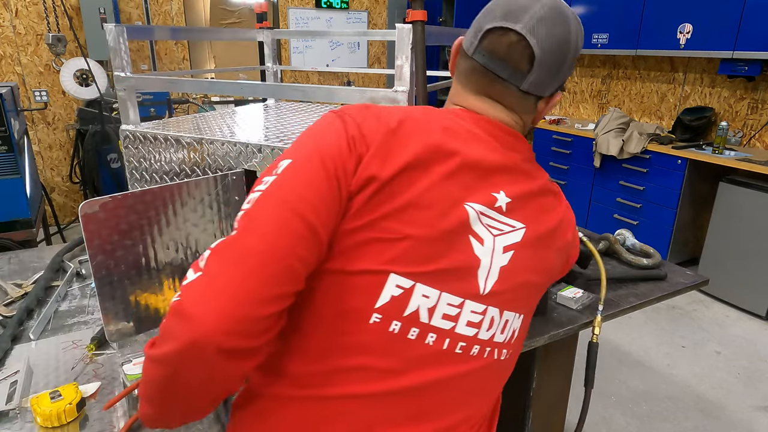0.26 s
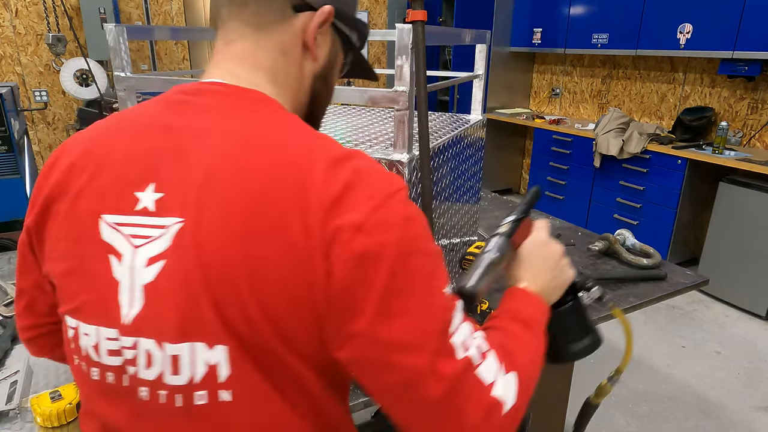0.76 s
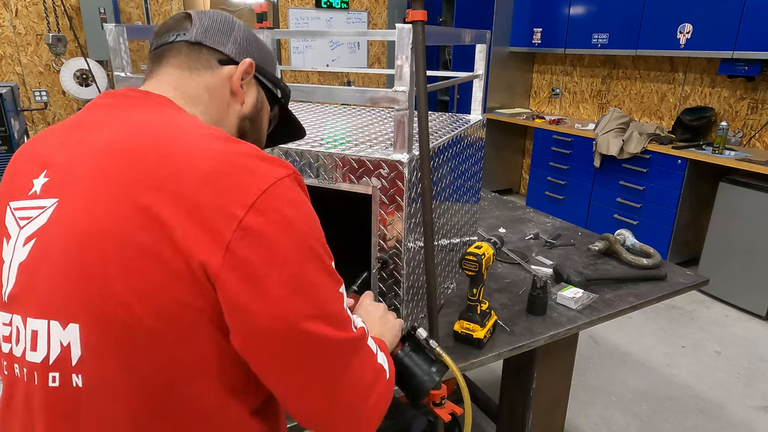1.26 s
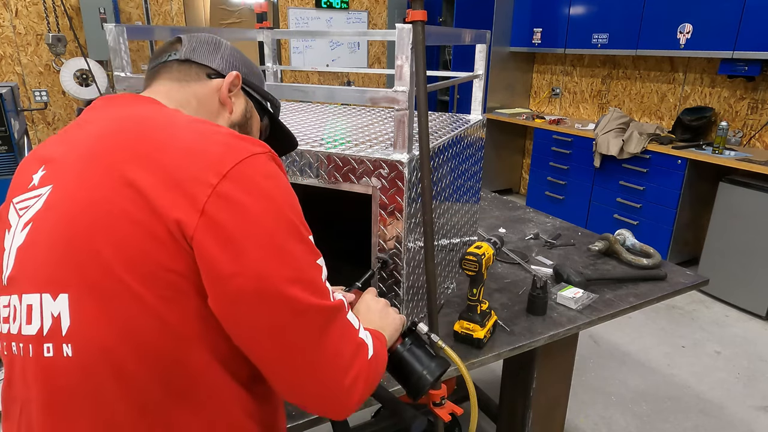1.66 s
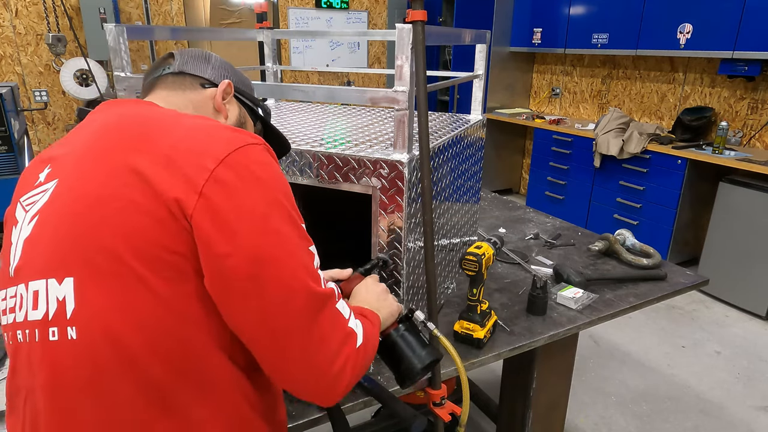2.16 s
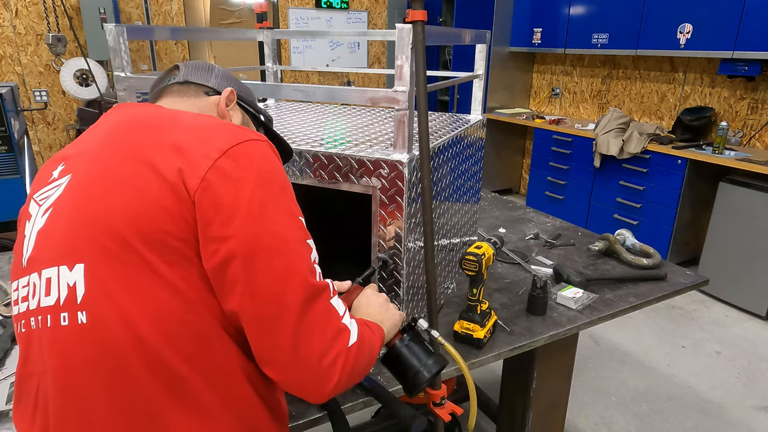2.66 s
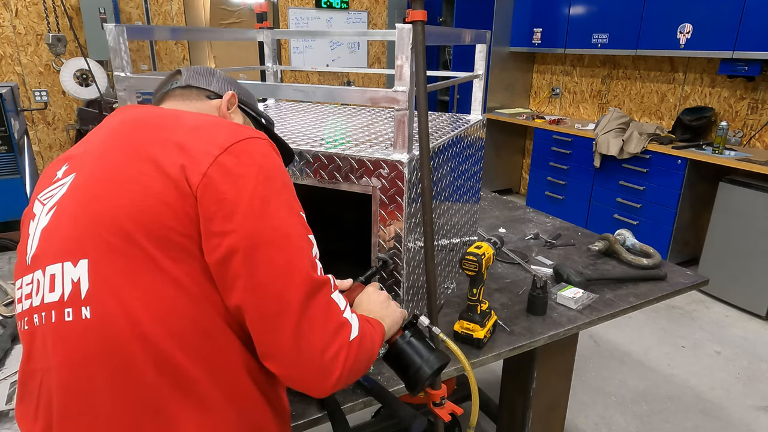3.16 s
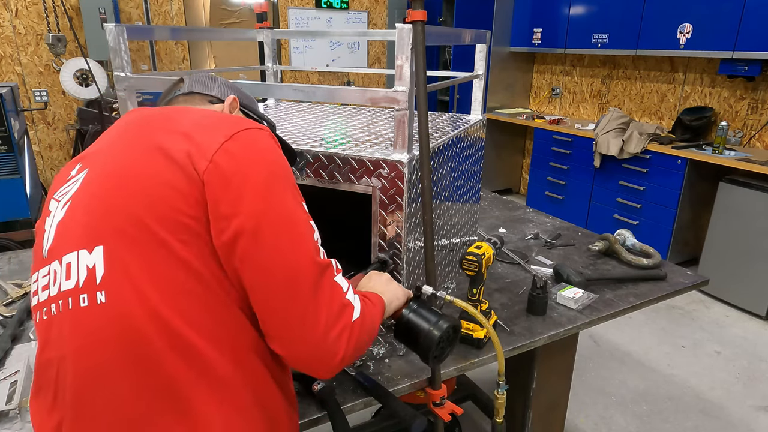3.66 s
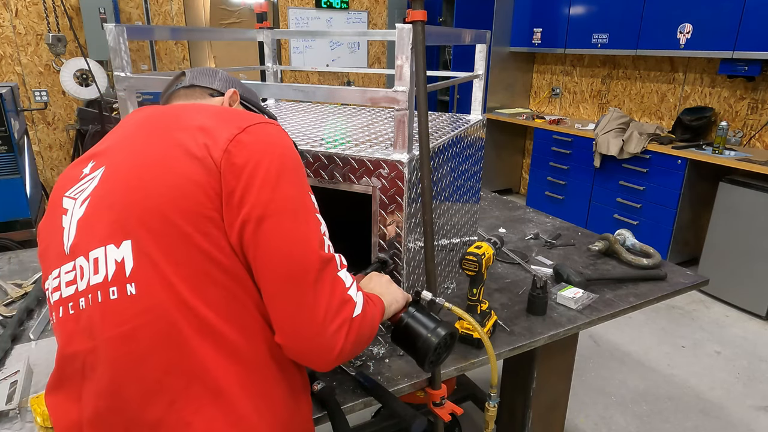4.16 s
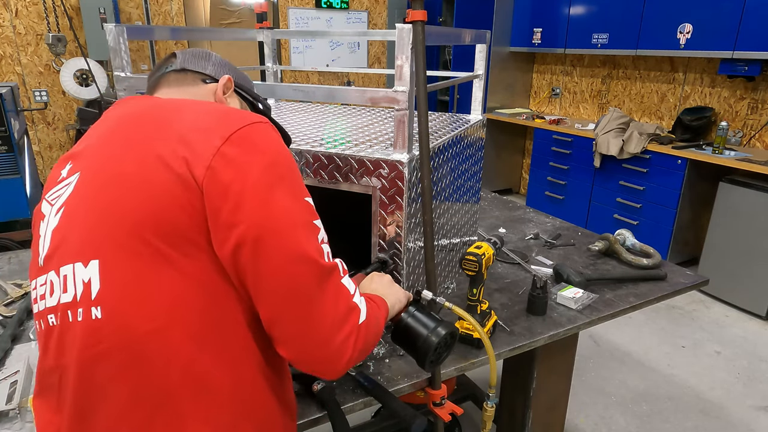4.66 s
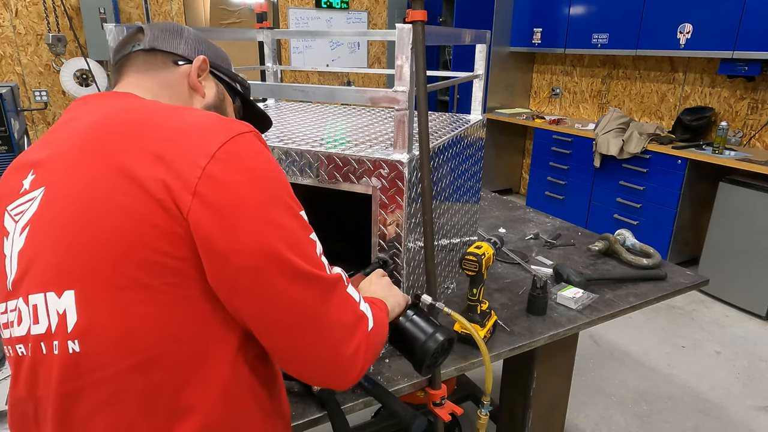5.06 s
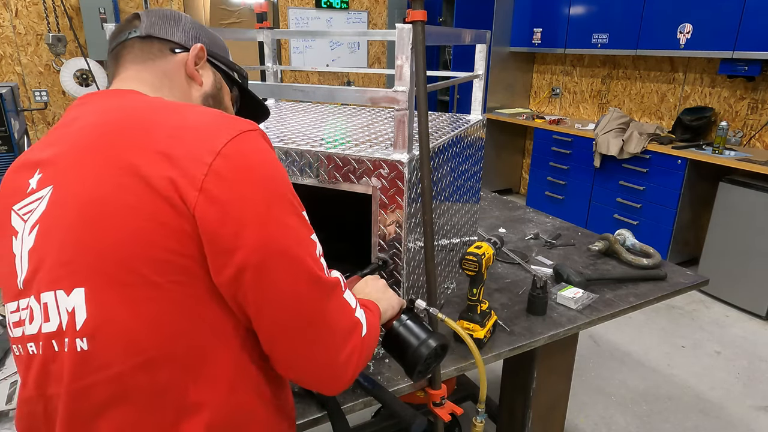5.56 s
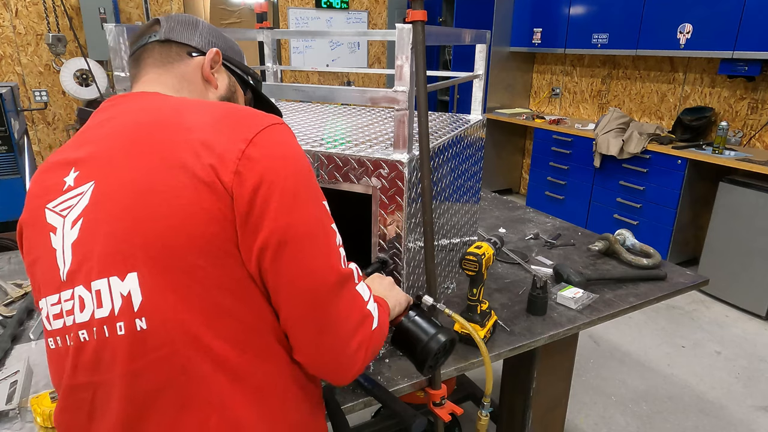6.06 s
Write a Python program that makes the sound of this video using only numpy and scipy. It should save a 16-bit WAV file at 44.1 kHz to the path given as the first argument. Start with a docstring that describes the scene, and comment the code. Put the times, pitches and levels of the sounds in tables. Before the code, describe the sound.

A pneumatic rivet gun is heard close up in a reverberant shop with a low fan rush. First come light tool clanks, a short rasp of steel, and scattered taps and clinks against a hollow metal box. Then air hisses and the rivet breaks with one loud, thumping, ringing crack. The gun vents sharply, knocks against the plate a few more times and starts hissing again.

```python
"""Tools clank on a steel workshop bench, then an air rivet gun is dragged off it and its nose bumps
and scrapes a hollow aluminium tread-plate box. The valve opens and hisses, the mandrel snaps and
sets the plate ringing, and on release the piston vents in a blast. On a second pull the gun kicks
hard against the box. One microphone, close to the work, with the hall and its ventilation behind;
it overloads on the snap and turns its gain down."""
import sys
import numpy as np
from scipy import signal
from scipy.fft import rfft, irfft, next_fast_len
from scipy.io import wavfile

SR = 44100
rng = np.random.default_rng(int(sys.argv[2]) if len(sys.argv) > 2 else 0)


def dump_mix(stems):
    """Bounce the given channels to the path in sys.argv[1] as a 16-bit WAV at rate SR."""
    frames = np.atleast_2d(stems).T  # one column per channel
    limited = np.clip(frames, -1, 1)  # hard clip at full scale
    pcm = np.round(limited * 32767).astype(np.int16)
    wavfile.write(sys.argv[1], SR, pcm)


N = 278267
SIZE = next_fast_len(N, True)
TIME = np.arange(N) / SR
FREQ = np.maximum(np.fft.rfftfreq(SIZE, 1 / SR), 1)

# the mandrel breaks, then the piston recoils
SNAP_S, SNAP_DB, RECOIL_AFTER_S, RECOIL_DB = 4.246, -38.5, 0.015, -41.5
# spectrum of both blows: f/Hz, level/dB
SNAP_COLOUR = [(35, 11.5), (150, -6), (925, 4), (2790, -1.5), (7270, -8.5)]
# broad colour of struck metal: f/Hz, level/dB
METAL_COLOUR = [(30, -35), (60, -9.5), (95, -2), (150, -8.5), (210, -3.5), (350, -1), (620, -2.5),
                (1500, 0), (3600, 8.5), (4600, -1), (5900, -1), (7400, -5.5), (11500, -10), (15500, -26.5)]
# plate modes of the box: f/Hz, level/dB, t60/s
BOX_MODES = [(95.6, -3.5, 1.15), (128.4, -9.5, 3), (179, -9.5, 2), (218, 1.5, 1.3), (316, -4.5, 1.5),
             (345, -2.5, 1.73), (504.6, 3.5, 0.98), (658, 1.5, 1.1), (980, 5, 0.57), (1050, 7, 0.92),
             (1495, 5, 0.9), (1703, 4, 0.96), (2454, 1.5, 0.55), (2795, -2, 0.7), (3567, -0.5, 0.55),
             (3796, -1, .65)]
# resonances and dips of the riveted plate: f/Hz, width/Hz, gain/dB
PLATE_PEAKS = [(205, 81, 10.5), (358, 35, -8.5), (1490, 500, 5), (2104, 240, -9.5), (2380, 220, 2.5),
               (3800, 370, 2)]
# resonances and dips of the hollow box: f/Hz, width/Hz, gain/dB
HOLLOW_PEAKS = [(314, 20, 6), (4234, 140, -8), (5770, 850, 7)]

# trigger pulls: t/s, hold/s, seal squeak/dB, valve opening time/s
PULLS = [(4.057, 0.8443, -20.5, 0.01), (5.879, .841, -26.5, 0.0091)]
# hiss of the open valve: f/Hz, level/dB
LEAK_COLOUR = [(300, -10), (2800, -3.5), (3800, 4.5), (4700, -9), (5700, 0.5), (9500, -1.5), (12500, -8),
               (15500, -12.5)]
# resonance of the air port: f/Hz, width/Hz, gain/dB
PORT_PEAK = [(2460, 160, 4.4)]
# edge tones at the valve: f/Hz, level re flow at full swell/dB
WHISTLES = [(7700, -3), (11600, -11.5)]
# exhaust air: f/Hz, level/dB
VENT_COLOUR = [(40, -14.5), (250, -19.5), (1300, -8.5), (2000, -5.5), (3100, 3.5), (4400, -9.5),
               (5700, -2.5), (7200, -11.5), (8700, -7.5), (12000, -18), (15500, -22)]
# the slow exhaust loses its top: f/Hz, width/Hz, gain/dB
RETURN_MUFFLE = [(12800, 7500, -15.5)]
# the mandrel and the returning piston squeak as they slide: t/s, f/Hz, level/dB, length/s
SLIDE_SQUEAKS = [(2.046, 5650, -31.5, 0.039), (5.085, 3310, -32.5, 0.028), (5.16, 9300, -53, 0.04),
                 (5.196, 8000, -44.5, 0.022), (5.203, 3170, -29, 0.032)]
# piston seals on each pull: delay/s, f/Hz, level re seal squeak/dB, length/s
SEAL_TONES = [(0.02, 3090, -3, 0.019), (0.021, 2130, -10, 0.039), (.054, 5470, -23, .13)]

# nose bumps on the box: t/s, push/dB, contact/ms, tick/dB, panel f/Hz, panel ring re push/dB
BUMPS = [(1.709, -65.5, 2.3, -96, 1056, 29), (2.0, -42.5, 4.7, -81, 391.6, 18.5),
         (2.023, -53, 0.91, -74.5, 475.5, 21.5), (2.051, -44, 3.6, -71, 347.4, 18),
         (2.147, -45, 3.3, -65.5, 343.7, 21.5), (2.228, -43.5, 1.53, -67, 1416, 24.5),
         (2.237, -46, 5.7, -84, 363, 24), (2.772, -55, 3.84, -93, 1054, 24),
         (3.039, -61.5, 1.7, -86, 357, 17), (3.328, -50, 1.19, -79, 321, 20.5),
         (4.08, -54, 1.12, -72.5, 980, -9), (5.158, -46.5, 2.75, -85, 475.3, 22.5),
         (5.238, -56.5, 2.66, -83.5, 1123, 31), (5.691, -50.5, 1.43, -85.5, 503, 25),
         (5.699, -54.5, 1.18, -94, 727, 26), (5.906, -41.5, 5.5, -77, 483, 20),
         (5.965, -44, 0.71, -67.5, 1488, 20.5)]
PUSH_FALL, PUSH_TOP_HZ, TICK_FROM_HZ = 0.74, 5230, 2900   # the push loses treble, the tick takes over
# the nose scrapes the plate, pressing ever harder: t/s, length/s, final push/dB
SCRAPES = [(2.125, 0.024, -49), (2.735, 0.04, -69.5), (3.235, 0.09, -59.5), (5.062, 0.087, -55.5),
           (5.17, .06, -55)]
SCRAPE_SWELL_DB, SCRAPE_CONTACT_MS, SCRAPE_TICK_RE_PUSH_DB = 6, 2.3, -37
SCRAPE_LOW_HZ = 200   # a glancing touch moves no bass
# knocks that jar the steel body of the gun: t/s, f/Hz, level/dB
JARS = [(1.709, 2340, -55), (2.227, 3434, -28), (3.329, 2943, -33.5), (5.693, 3286, -29)]
# the loose mandrel clinks in the nose: t/s, level/dB
CLINKS = [(1.707, -61), (1.797, -64.5), (2.148, -58), (3.038, -68), (3.326, -49.5), (3.432, -56.5),
          (5.24, -62)]
# modes of the mandrel: f/Hz, level/dB, t60/s
MANDREL_MODES = [(5730, 5, 0.11), (7870, -3, 0.17), (13000, -7, 0.085)]
# the gun rubs the plate as it is lined up: t/s, length/s, level/dB
RUBS = [(2.989, 0.051, -54), (3.665, 0.23, -58)]
# resonances of the rubbing nose: low f/Hz, high f/Hz, level/dB
RUB_BANDS = [(2780, 3700, 0), (5200, 6200, -5)]

# short drags of the gun over the bench: t/s, length/s, rasp/dB, bench judder/dB
DRAGS = [(0.948, 0.023, -37, -45.5), (0.972, 0.048, -33.5, -59), (1.046, 0.045, -39, -47.5)]
# rasp of steel on steel: f/Hz, level/dB
RASP_COLOUR = [(400, -22), (1000, -6), (2800, 3.5), (3700, 2), (4500, -13.5), (6000, -11.5), (15000, -49)]
# tools land on the bench: t/s, level/dB, tilt/(dB per octave)
CLANKS = [(0.153, -86, -7), (.195, -60.5, -0.5), (.203, -57.5, -1)]
# spectrum of a clank: f/Hz, level/dB
CLANK_COLOUR = [(80, -18.5), (925, -3), (2790, -2.5), (7270, -23.5)]
# modes of the bench: f/Hz, level/dB, t60/s
BENCH_MODES = [(338, 17.5, 1), (577, 22.5, 0.85), (854, 21, 1), (2600, 23.5, 0.81)]

# decay of the workshop hall: f/Hz, t60/s
HALL_T60 = [(60, 0.61), (200, 1.83), (500, 1.24), (1200, 0.75), (3000, 0.86), (6000, 0.78), (10000, 0.36)]
# colour of the hall as heard at the microphone: f/Hz, level/dB
HALL_COLOUR = [(60, -6.5), (250, -17.5), (800, -10), (3000, -17), (8000, -11.5), (15000, -23)]
# ventilation noise: f/Hz, level/dB
FAN_COLOUR = [(25, -2.5), (110, -14.5), (350, -18), (600, -20.5), (4800, -23.5), (10000, -34.5),
              (15500, -37)]
# its resonances: f/Hz, width/Hz, gain/dB
FAN_PEAKS = [(1070, 210, 8.9), (1900, 270, 7.5), (3080, 240, 8.5), (8150, 590, 5.6)]


def rivet_snap():
    """The mandrel breaks and the piston recoils: two blows, as times and strengths at any pitch."""
    times, blow_db = [SNAP_S, SNAP_S + RECOIL_AFTER_S], np.array([SNAP_DB, RECOIL_DB])
    return times, lambda hz: from_db(blow_db + at_hz(SNAP_COLOUR, hz))


def snap_thump(db, hz, t60):
    """A short, deep thump at the snap."""
    return ring(clicks([SNAP_S], [from_db(db)]), hz, t60)


def clatter(blows, peaks, bass_t60, level_db, crack_db, crack_t60, damping, swell_share,
            hall_db, mode_db, ripple_db):
    """Struck metal: a brief crack, then plate modes too dense to tell apart, then the hall."""
    times, strength = blows
    out, edges, age = np.zeros(N), np.geomspace(28, 17000, 29), TIME[:SR]
    crowding = resonances([(hz, 8 + hz / 90, mode_db) for hz, _, _ in BOX_MODES])   # round clear modes
    comb = ripple(ripple_db, longest_s=0.01) * FREQ / (FREQ + 1500)
    colour = at_hz(METAL_COLOUR, FREQ) + resonances(peaks) + crowding + comb + level_db
    wash = rfft(rng.standard_normal(SIZE)) * from_db(colour) * np.sqrt(SR / 2)
    crack = from_db(2 * crack_db - 120 * age / crack_t60)
    for low, high in zip(edges, edges[1:]):
        hz, power = np.sqrt(low * high), np.zeros(N)
        t60 = bass_t60 * (1 + (hz / 5000) ** 2) ** -damping   # treble dies first
        swell_s = swell_share * bass_t60 * (1 + 800 / hz)   # slow bending waves build up last
        swell = 1 - np.exp(-age / swell_s)
        shape = swell * np.exp(-np.log(1e6) * age / t60) + crack * hz / (hz + 6000)
        shape *= (1 - np.exp(-age * hz)) ** 4   # each band needs a cycle or two to start
        for s, size in zip(times, strength(hz)):
            start = int(s * SR)
            power[start:start + SR] += size ** 2 * shape[:N - start]
        envelope = hall_envelope(power, at_hz(HALL_COLOUR, hz) + hall_db, at_hz(HALL_T60, hz))
        out += irfft(wash * ((FREQ >= low) & (FREQ < high)), SIZE)[:N] * envelope
    return out


def box(blows, level_db, scatter_db=3.5, split_hz=4.95):
    """Each blow rings the modes of the box in beating pairs, as strongly as its landing spot allows."""
    (times, strength), out = blows, np.zeros(N)
    for hz, db, t60 in BOX_MODES:
        for side in (-1, 1):
            spot = from_db(scatter_db * rng.standard_normal(len(times)))
            spot *= rng.choice([-1, 1], len(times))
            hits = clicks(times, strength(hz) * from_db(db + level_db) * spot)
            out += ring(hits, hz + side * split_hz * rng.random(), t60)
    return out


def air_jet(flow, colour, peaks, hall_db, hall_t60, ripple_db, sputter_db):
    """A turbulent jet follows the flow, sputters, drifts between two spectra and hangs in the hall."""
    power = (flow * from_db(sputter_db * band(12.4, 150))) ** 2
    comb = ripple(ripple_db, longest_s=0.0026) * FREQ / (FREQ + 3000)
    steady = at_hz(colour, FREQ) + resonances(peaks) + comb
    one, other = (noise(steady + ripple(ripple_db, longest_s=0.007)) for _ in range(2))
    turn = band(2.0, 7.3)
    return (one * np.cos(turn) + other * np.sin(turn)) * hall_envelope(power, hall_db, hall_t60)


def blast_flow(db, peak_s):
    """On release the piston dumps its air: the flow swells to a peak and empties."""
    ages = [since(s + held) / peak_s for s, held, *_ in PULLS]
    return from_db(db) * sum((age * np.exp(1 - age)) ** 2 for age in ages)


def return_flow(chuff_db, chuff_s, hiss_db, fall_db_per_s, travel_s):
    """The valve chuffs on release, then a hiss fades until the piston is home."""
    flow = np.zeros(N)
    for s, held, *_ in PULLS:
        age = since(s + held)
        sliding = (age > 0) & (age < travel_s)
        chuff = from_db(chuff_db) * np.exp(-age / chuff_s)
        flow += sliding * np.hypot(chuff, from_db(hiss_db - fall_db_per_s * age))
    return flow


def leak_flow(spurt_db, spurt_s, leak_db, build_db_per_s, close_s):
    """A spurt as the valve opens, then a leak that grows until it closes."""
    flow = np.zeros(N)
    for s, held, _, open_s in PULLS:
        age = since(s)
        valve = np.clip(np.minimum(age / open_s, (held - age) / close_s), 0, 1)
        spurt = from_db(spurt_db) * np.exp(-(age / spurt_s) ** 2)
        flow += valve * np.hypot(spurt, from_db(leak_db + build_db_per_s * age))
    return flow


def whistles(flow, waver, flutter_hz):
    """Edge tones at the valve wander in pitch and swell while the trigger is held."""
    swell = sum(since(s) / held * (since(s) < held) for s, held, *_ in PULLS)
    tones = sum(from_db(db) * rough_tone(hz * (1 + waver * band(2, 10)), flutter_hz)
                for hz, db in WHISTLES)
    return flow * swell * tones


def squeaks(width, fall, hall_db, hall_t60):
    """Rough friction tones: sliding parts fall in pitch as they slow, the seals hold theirs."""
    out = np.zeros(N)
    slides = [(*row, fall) for row in SLIDE_SQUEAKS]
    seals = [(s + delay, hz, pull_db + db, length, 0)
             for s, _, pull_db, _ in PULLS for delay, hz, db, length in SEAL_TONES]
    for s, hz, db, length, drop in slides + seals:
        along = np.clip((TIME - s) / length, 0, 1)
        envelope = hall_envelope(np.sin(np.pi * np.sqrt(along)) ** 2, hall_db, hall_t60)
        out += from_db(db) * envelope * rough_tone(hz * (1 + drop * (0.5 - along)), hz * width)
    return out


def nose_contacts(touches=8):
    """The nose bumps the box and scrapes it in runs of small touches: times and strengths."""
    rows = [(*bump[:4], 0) for bump in BUMPS]
    for s, length, db in SCRAPES:
        for along in (np.arange(touches) + rng.random(touches)) / touches:
            touch_db = db - SCRAPE_SWELL_DB * (1 - along)
            rows.append((s + along * length, touch_db, SCRAPE_CONTACT_MS,
                         touch_db + SCRAPE_TICK_RE_PUSH_DB, SCRAPE_LOW_HZ))
    times, push_db, contact_ms, tick_db, low_hz = np.transpose(rows)

    def strength(hz):
        """A push, duller the longer the contact, plus a bright metal tick."""
        push = from_db(push_db) * (1 + (hz * contact_ms / 1000) ** 2) ** -PUSH_FALL
        push /= (1 + (hz / PUSH_TOP_HZ) ** 6) * (1 + (low_hz / hz) ** 2)
        tick = from_db(tick_db) / (1 + (TICK_FROM_HZ / hz) ** 4)
        return np.hypot(push, tick)
    return times, strength


def panels(blows, t60, spread):
    """The panel under each bump sings on at its own pitch, as loudly as the bump drives it there."""
    (_, strength), out = blows, np.zeros(N)
    for k, (s, *_, hz, ring_db) in enumerate(BUMPS):
        hit = clicks([s], [strength(hz)[k] * from_db(ring_db)])
        out += cluster(hit, hz, t60, spread, count=8)
    return out


def gun_body(t60, spread):
    """The jarred gun rings in a tight cluster of high modes."""
    return sum(cluster(clicks([s], [from_db(db)]), hz, t60, spread, count=6) for s, hz, db in JARS)


def mandrel(spread):
    """The loose steel pin rings high and briefly."""
    times, clink_db = np.transpose(CLINKS)
    return sum(cluster(clicks(times, from_db(clink_db + db)), hz, t60, spread, count=6)
               for hz, db, t60 in MANDREL_MODES)


def rubs():
    """Light friction swells and fades in two resonances of the gun's nose."""
    pressure = sum(from_db(db) * np.sin(np.pi * np.minimum(since(s) / length, 1))
                   for s, length, db in RUBS)
    return pressure * sum(from_db(db) * band(low, high) for low, high, db in RUB_BANDS)


def drag(slips_per_s, grit_db, judder_hz, hall_db, hall_t60):
    """Steel slips over steel in tiny jerks that rasp and shake the bench top."""
    slips = (rng.random(N) < slips_per_s / SR) * from_db(grit_db * rng.standard_normal(N)) ** 2
    grain, out = linger(slips / slips.mean(), t60=0.028), np.zeros(N)
    rasp = noise(at_hz(RASP_COLOUR, FREQ) + ripple(2.5, longest_s=0.007))
    judder = band(*judder_hz)
    for column, sound in enumerate((rasp, judder)):
        pushes = sum(from_db(2 * db[column]) * ((TIME >= s) & (TIME < s + length))
                     for s, length, *db in DRAGS)
        out += sound * hall_envelope(grain * pushes, hall_db, hall_t60)
    return out


def tool_clanks():
    """Tools hit the bench, each with its own brightness: times and strengths."""
    times, db, tilt = np.transpose(CLANKS)
    return times, lambda hz: from_db(db + at_hz(CLANK_COLOUR, hz) + tilt * np.log2(hz / 1500))


def bench(blows, spread):
    """Every clank rings the modes of the steel bench."""
    times, strength = blows
    return sum(cluster(clicks(times, strength(hz) * from_db(db)), hz, t60, spread, count=5)
               for hz, db, t60 in BENCH_MODES)


def ripple(depth_db, longest_s, count=12):
    """Reflections off nearby metal comb the spectrum; a dB curve."""
    lags = longest_s * rng.uniform(0.204, 1, count)
    return depth_db * rms_one(sum(np.cos(2 * np.pi * FREQ * lag) for lag in lags))


def hall_envelope(power, hall_db, t60):
    """Amplitude at the microphone: direct power plus what lingers in the hall."""
    return np.sqrt(power + from_db(2 * hall_db) * linger(power, t60))


def ventilation(db):
    """Room tone: the steady rush of a fan behind the work."""
    return from_db(db) * noise(at_hz(FAN_COLOUR, FREQ) + resonances(FAN_PEAKS))


def from_db(db):
    """Decibels to gain."""
    return 10 ** (np.asarray(db) / 20)


def rms_one(x):
    """Scale to unit rms."""
    return x / np.sqrt(np.mean(x ** 2) + 1e-20)


def since(s):
    """Seconds since a moment, zero before it."""
    return np.maximum(TIME - s, 0)


def at_hz(points, hz):
    """Read a table on a log-frequency axis."""
    points = np.array(points)
    return np.interp(np.log(hz), np.log(points[:, 0]), points[:, 1])


def resonances(peaks):
    """The dB curve of a set of resonances."""
    return sum(db / (1 + (2 * (FREQ - hz) / width) ** 2) for hz, width, db in peaks)


def noise(colour_db):
    """Unit noise shaped by a dB curve."""
    return rms_one(irfft(rfft(rng.standard_normal(SIZE)) * from_db(colour_db), SIZE)[:N])


def band(low, high):
    """Unit noise between two edges in Hz."""
    bandpass = signal.butter(3, [low, high], "band", fs=SR, output="sos")
    return rms_one(signal.sosfilt(bandpass, rng.standard_normal(N)))


def rough_tone(hz, flutter_hz):
    """A fluttering tone of unit rms that follows a pitch curve."""
    return np.sqrt(2) * band(8.9, flutter_hz) * np.sin(2 * np.pi * np.cumsum(hz) / SR)


def clicks(times, sizes):
    """One click of a given size at each time."""
    return np.bincount((np.asarray(times) * SR).astype(int), sizes, N)[:N]


def ring(hits, hz, t60):
    """A unit click sets a sine of height 1 ringing."""
    r, w = 1e-3 ** (1 / (t60 * SR)), 2 * np.pi * hz / SR
    return signal.lfilter([0, np.sin(w)], [1, -2 * r * np.cos(w), r * r], hits + 1e-18)


def cluster(hits, hz, t60, spread, count):
    """Close modes that beat and radiate little below their pitch."""
    offsets = (np.arange(count) + rng.random(count)) * 2 / count - 1
    modes = sum(rng.choice([-1, 1]) * ring(hits, hz * (1 + spread * offset), t60) for offset in offsets)
    return signal.sosfilt(signal.butter(2, hz / 2, "high", fs=SR, output="sos"), modes)


def linger(power, t60):
    """Energy gathers and drains 60 dB in t60 seconds."""
    r = 1e-6 ** (1 / (t60 * SR))
    return signal.lfilter([1 - r], [1, -r], power + 1e-20)


def scene():
    """Metal, air and room tone meet at one close microphone, the same on both channels."""
    tools, nose, rivet = tool_clanks(), nose_contacts(), rivet_snap()
    clanking = clatter(tools, HOLLOW_PEAKS, bass_t60=0.38, level_db=2.5, crack_db=7.5, crack_t60=0.026,
                       damping=0.13, swell_share=0.017, hall_db=13.0, mode_db=8.0, ripple_db=3.5)
    bumping = clatter(nose, HOLLOW_PEAKS, bass_t60=0.38, level_db=2.0, crack_db=7.0, crack_t60=0.011,
                      damping=0.6, swell_share=0.02, hall_db=9.0, mode_db=0.5, ripple_db=2.5)
    snapping = clatter(rivet, PLATE_PEAKS, bass_t60=0.25, level_db=2.5, crack_db=7.0, crack_t60=0.072,
                       damping=0.11, swell_share=0.034, hall_db=5.0, mode_db=9.5, ripple_db=0.5)
    snapping += snap_thump(db=-16.5, hz=48, t60=0.17)
    ringing = bench(tools, spread=0.074) + mandrel(spread=0.068)
    ringing += panels(nose, t60=0.7, spread=0.14) + gun_body(t60=0.21, spread=0.1)
    ringing += box(nose, level_db=9.0) + box(rivet, level_db=0.5)
    dragging = drag(slips_per_s=2900, grit_db=-4.5, judder_hz=(313, 865), hall_db=-3.0, hall_t60=0.6)

    leak = leak_flow(spurt_db=-35, spurt_s=0.054, leak_db=-47, build_db_per_s=4, close_s=0.059)
    blast = blast_flow(db=-16.5, peak_s=0.029)
    homing = return_flow(chuff_db=-21, chuff_s=0.02, hiss_db=-24.5, fall_db_per_s=51, travel_s=0.328)
    air = air_jet(leak, LEAK_COLOUR, PORT_PEAK,
                  hall_db=-2.5, hall_t60=0.74, ripple_db=2.0, sputter_db=1.5)
    air += whistles(leak, waver=0.014, flutter_hz=200)
    air += air_jet(blast, VENT_COLOUR, (), hall_db=-7.0, hall_t60=0.47, ripple_db=2.0, sputter_db=-1.0)
    air += air_jet(homing, VENT_COLOUR, RETURN_MUFFLE,
                   hall_db=-8.5, hall_t60=0.51, ripple_db=4.0, sputter_db=1.5)

    room_tone = ventilation(db=-57)
    friction = rubs() + squeaks(width=0.042, fall=0.09, hall_db=-9.0, hall_t60=0.25)
    mono = snapping + air + bumping + ringing + friction + dragging + clanking + room_tone
    return np.array([mono, mono])


def gain_control(x, threshold_db, recover_db_per_s, attack_s):
    """The gain drops when the sound passes a threshold and creeps back."""
    level_db = 10 * np.log10(linger(x[0] ** 2, t60=0.11))
    over_db = np.maximum(level_db - threshold_db, 0)
    cut_db = np.maximum.accumulate(over_db + recover_db_per_s * TIME) - recover_db_per_s * TIME
    r = np.exp(-1 / (attack_s * SR))
    return x * from_db(-signal.lfilter([1 - r], [1, -r], cut_db))


def record(dry):
    """The microphone's gain control, overload on what slips past it, and a steep top cut."""
    ducked = gain_control(dry, threshold_db=-6.5, recover_db_per_s=25.5, attack_s=0.0013)
    top_cut = signal.ellip(10, 0.2, 70, 15900, fs=SR, output="sos")
    return signal.sosfilt(top_cut, np.clip(ducked, -1, 1))


dry = scene()
out = record(dry)
dump_mix(out)
```